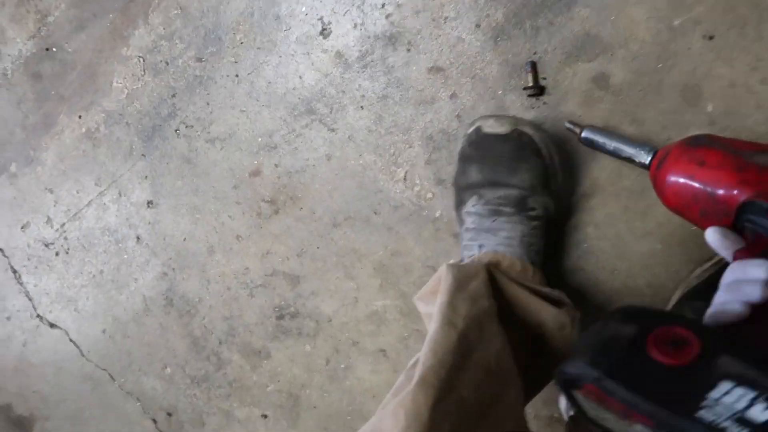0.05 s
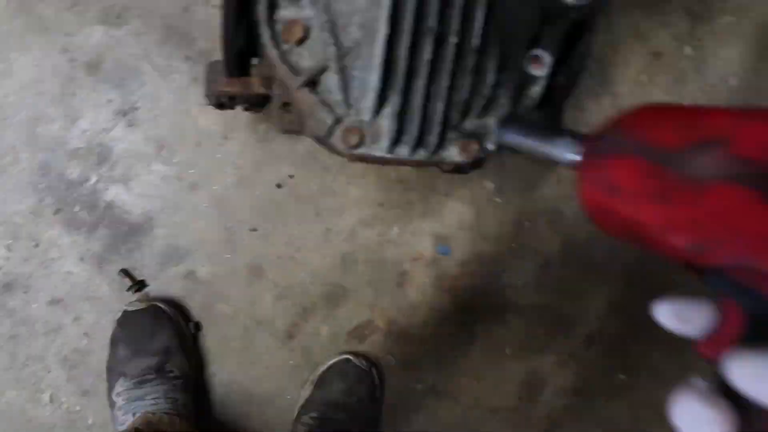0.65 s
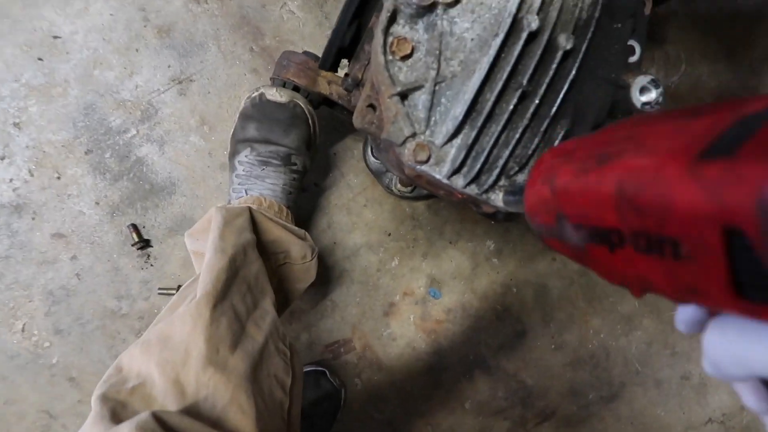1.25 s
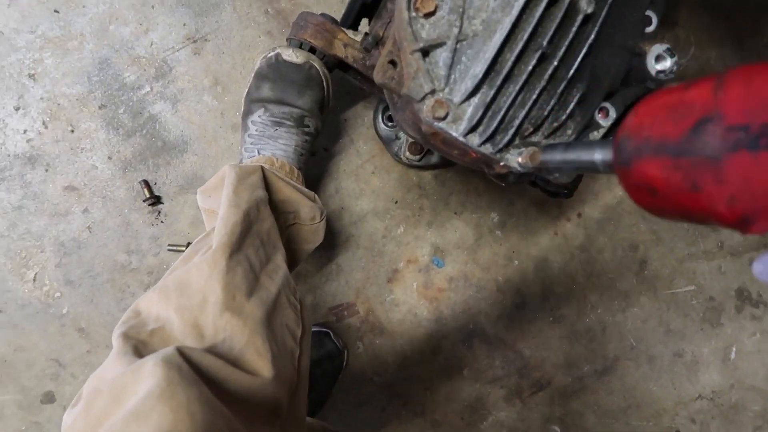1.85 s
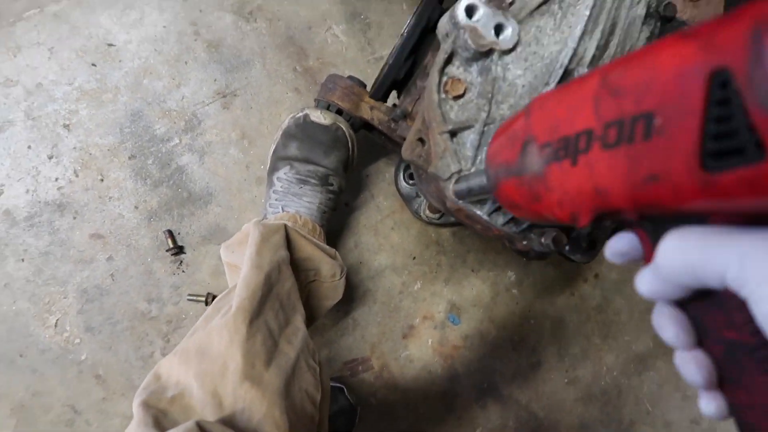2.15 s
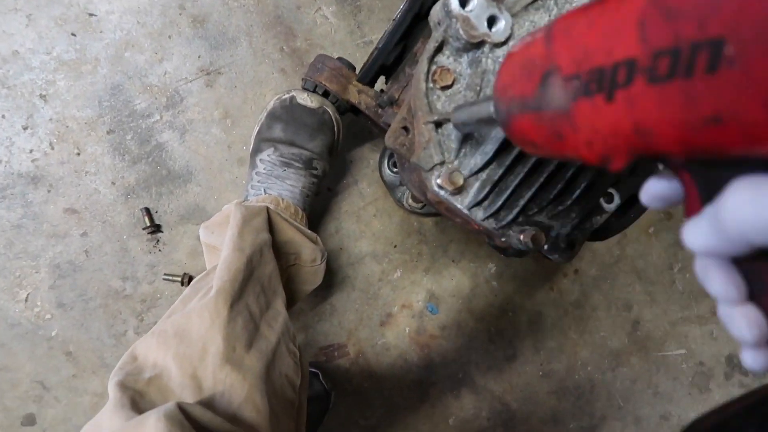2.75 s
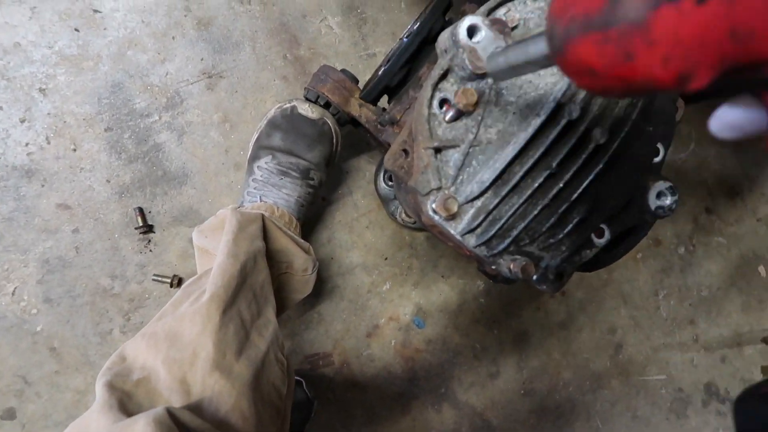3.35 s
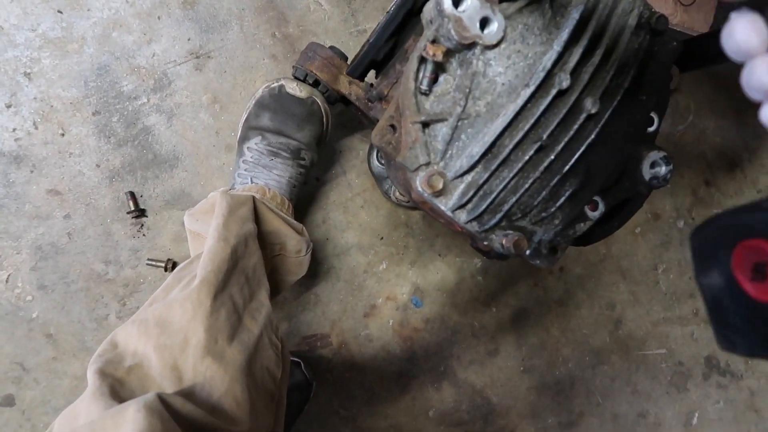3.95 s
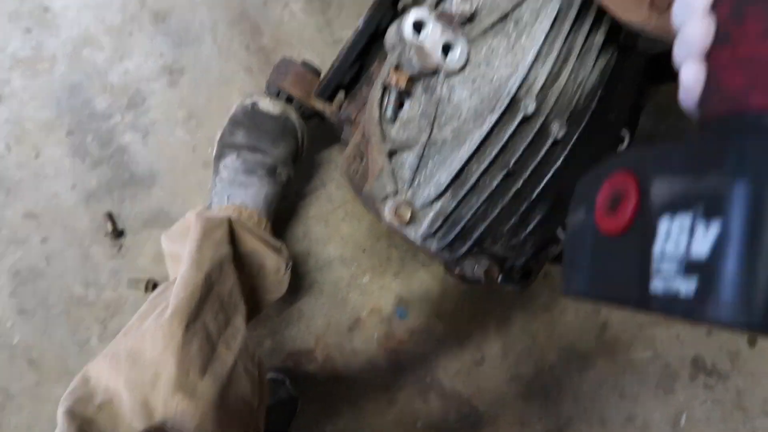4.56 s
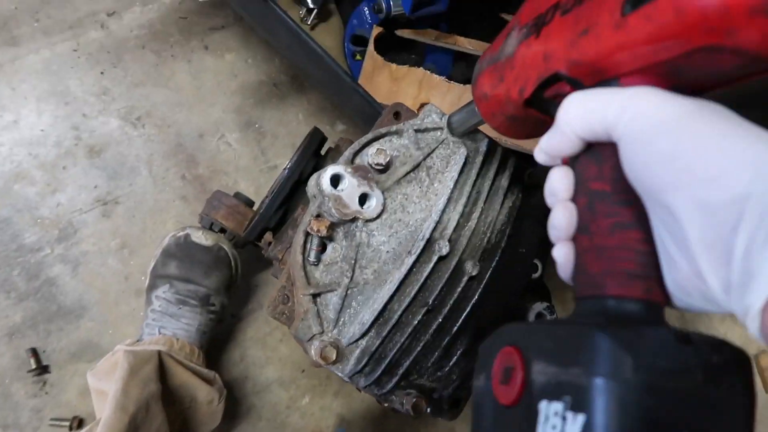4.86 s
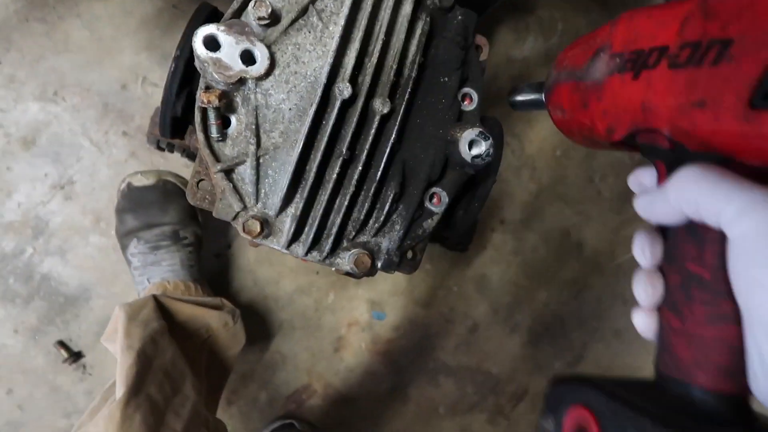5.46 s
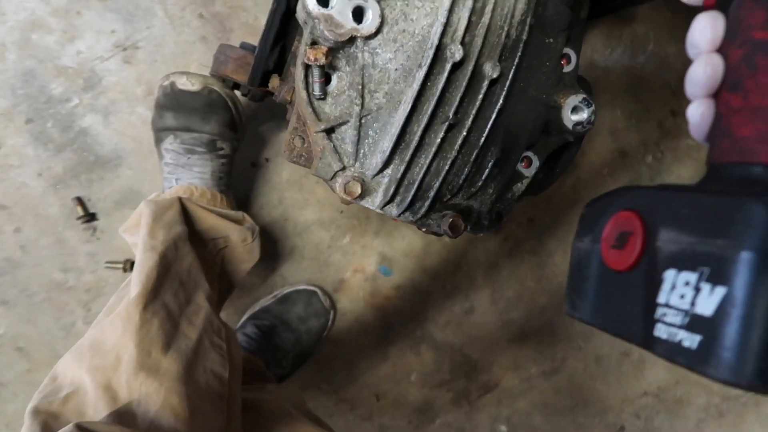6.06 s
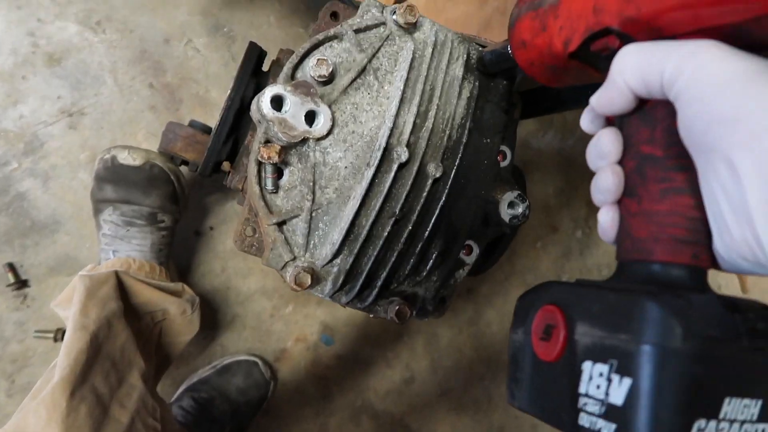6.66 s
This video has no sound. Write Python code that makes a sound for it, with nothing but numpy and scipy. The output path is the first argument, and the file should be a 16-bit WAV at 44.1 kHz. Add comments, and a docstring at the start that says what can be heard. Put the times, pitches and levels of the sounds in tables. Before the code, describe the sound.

Soft shuffling and a knock lead into five brief, sharp hammering bursts from a cordless impact wrench, about a second apart and very near the microphone. The motor whirs down after each one, and the socket clacks against the next bolt with a short ring. After the last burst, boots and tool bump about, with small gritty ticks and rustling cloth over the faint hiss of a workshop.

```python
"""A cordless impact wrench, close to a stereo microphone, knocks five bolts loose from a cast gear housing.
Each very short burst is a rattle of gears, a few hammer blows on the anvil and the falling whine of the
coasting motor. Between bursts the socket clanks onto bolt heads, boots and tool knock about, and clothes
rustle in a quiet workshop. The recorder's limiter ducks at the loud strikes, then lets the background
creep back up."""
import sys
import numpy as np
from scipy import signal
from scipy.fft import rfft, irfft, next_fast_len
from scipy.io import wavfile
from scipy.ndimage import uniform_filter1d, minimum_filter1d, map_coordinates

SR = 44100
rng = np.random.default_rng(int(sys.argv[2]) if len(sys.argv) > 2 else 0)


def materialize(psi):
    """Save the field psi as 16-bit PCM at rate SR to the path in sys.argv[1].

    A 1-D psi becomes a single channel; in a 2-D psi each row is a channel.
    """
    bounded = np.clip(np.atleast_2d(psi).T, -1, 1)
    quanta = np.round(bounded * 32767).astype(np.int16)
    wavfile.write(sys.argv[1], SR, quanta)


N = 296396

# how much the worker moves about: t/s, rumble level/dB
MOVEMENT = [(0, -46.5), (.38, -51), (.6, -40.5), (.76, -54.5), (.97, -46.5), (1.06, -43), (1.46, -42.5),
            (1.54, -46), (1.63, -51.5), (1.66, -75), (1.9, -69), (2.08, -59.5), (2.2, -48), (2.6, -59),
            (2.98, -53), (3.25, -59.5), (3.68, -53), (4.15, -56), (4.65, -49), (5.05, -56.5), (5.63, -49.5),
            (5.95, -55.5), (6.42, -41), (6.72, -48)]
# spectrum of rubbing cloth and scraping boots: f/Hz, level/dB
RUSTLE_SPECTRUM = [(180, -23), (300, -7), (816, -4), (1090, -9), (1240, -6), (1760, -24.5), (2000, -14),
                   (2600, -52), (4400, -120)]
# spectrum of struck steel: f/Hz, level/dB
STEEL_SPECTRUM = [(1000, -33), (1700, -2.5), (2300, -2), (2700, 5.5), (3220, -0.5), (4030, -12),
                  (4510, -5.5), (5300, -5), (6150, -6), (6880, -6), (7630, -5.5), (8800, -6), (10300, -10),
                  (11600, -10), (15200, -17), (16000, -30)]
# hammer contacts (graze, catch, strike, rebound): t/s, jolt/dB, jolt/Hz, crack/dB, ring/dB, main mode/Hz
HAMMER_BLOWS = [(1.4955, -4.5, 1200, -21.5, -13, 2750), (1.4979, -10, 1260, -1.5, -5.5, 9350),
                (1.4997, -18, 1260, -14, -5, 6900), (1.502, 10.5, 735, -6, -12, 2750),
                (1.5084, -6, 1210, -14, -19, 2750), (1.5115, 3.5, 680, -13, -17, 5200),
                (2.4139, -28, 1200, -20, -32, 11600), (2.4162, -15, 990, -28.5, -32, 5200),
                (2.428, -14, 1200, -13.5, -18, 2750), (2.436, -1.5, 547, -4, -5, 5200),
                (2.443, -19, 1400, -7, -9.5, 8650), (2.4462, 7, 897, -12.5, -14, 2750),
                (3.0886, -30, 1200, -26, -28, 5200), (3.0925, -18, 895, -24, -25, 5200),
                (3.1038, -12, 1304, -20, -13.5, 2750), (3.1062, -3.5, 1300, -4.5, 2.5, 8650),
                (3.1104, 6, 1050, -8.5, -18, 5200), (3.1175, -28, 1102, -19, -19, 8650),
                (3.1195, 2, 900, -21, -17, 11600), (3.8228, -24, 1106, -31, -30, 5200),
                (3.834, -6.5, 1100, -0.5, -11, 11600), (3.836, -16, 1250, -13, -10, 8650),
                (3.8381, 7.5, 931, -14, -6.5, 5200), (3.848, 2.5, 878, -15, -20, 2750),
                (4.8606, -32, 1300, -26.5, -31, 5200), (4.866, -6.5, 1320, -4, -7, 11600),
                (4.8686, -8.5, 1216, -20, -8, 2750), (4.876, -4, 1194, -2, -3.5, 9350),
                (4.8793, 7.5, 1000, -2, -13, 5200)]
# trigger pulls: strike/s, housing thud/dB, rattle/dB, release/s, whine/Hz, whine/dB,
# coasting time constant/s, whirr/dB, sizzle/dB, sizzle length/s
TRIGGER_PULLS = [(1.5017, 1, -15, 1.516, 11200, -47, .145, -37, -63, .33),
                 (2.4359, -9, -19, 2.462, 12250, -37, .195, -38, -58, .22),
                 (3.1102, -23, -17, 3.139, 13100, -35.5, .235, -37.5, -56.5, .32),
                 (3.8378, -18, -17, 3.878, 13100, -38.5, .245, -42, -56, .3),
                 (4.8791, -19, -17.5, 4.916, 12800, -35.5, .205, -37, -56.5, .27)]


def amp(db):
    """Decibels to gain."""
    return 10 ** (np.asarray(db) / 20)


def along(points, hz):
    """Read (f/Hz, value) points on a log frequency axis."""
    f, values = np.transpose(points)
    return np.interp(np.log(hz + 1), np.log(f + 1), values)


def curves(rows):
    """One value per sample for each column after the time."""
    times, *columns = np.transpose(rows)
    return [np.interp(np.arange(N) / SR, times, column) for column in columns]


def wobble(rate):
    """A smooth random curve, rate knots a second."""
    knots = rng.standard_normal(int(N * rate / SR) + 4)
    return map_coordinates(knots, [np.arange(N) * rate / SR])


def filtered(x, response):
    """Pass x through a complex response of frequency."""
    size = next_fast_len(N + SR // 2)
    return irfft(rfft(x, size) * response(np.fft.rfftfreq(size, 1 / SR)), size)[..., :N]


def noise(spectrum):
    """Noise of rms 1, coloured by (f/Hz, level/dB) points."""
    x = filtered(rng.standard_normal(N), lambda hz: amp(along(spectrum, hz)))
    return x / np.sqrt(np.mean(x ** 2) + 1e-20)


def add(track, s, sound):
    """Mix a sound into the track from time s on."""
    part = track[round(s * SR):][:len(sound)]
    part += sound[:len(part)]


def puffs(rows, rise, t60):
    """An envelope that swells quickly to each (t/s, level/dB) and dies away."""
    track, lead_s = np.zeros(N), .01
    t = np.arange(SR // 8) / SR - lead_s
    for s, db in rows:
        add(track, s - lead_s, amp(db - 60 * np.maximum(t, 0) / t60) * np.exp(np.minimum(t, 0) / rise))
    return track


def thumps(rows, first_hz, sweep, rise, fall):
    """A thump of dropping pitch at each (t/s, level/dB, f/Hz); sweep, rise and fall count in cycles."""
    track, lead_s = np.zeros(N), .01
    t = np.arange(SR // 30) / SR - lead_s
    for s, db, hz in rows:
        cycles = t * hz
        pitch = first_hz / (1 + max(first_hz / hz - 1, .05) * np.exp(cycles / sweep))
        phase = 2 * np.pi * np.cumsum(np.maximum(pitch, 0.3 * hz)) / SR
        shape = 1 / (np.exp(-cycles / rise) + np.exp(cycles / fall))
        wave = np.sin(phase - phase[round(lead_s * SR)] + rng.normal(0, 1.0))
        add(track, s - lead_s, amp(db) * shape / shape.max() * wave)
    return track


def diffuse(spectrum):
    """Stereo noise that reaches the microphone from all around."""
    # likeness of the two channels: f/Hz, left-right correlation
    likeness = [(60, 1), (150, 1), (380, 0.99), (950, 0.52), (2400, -0.5), (6000, -0.4), (15000, -0.56)]
    angle = lambda hz: np.arccos(np.clip(along(likeness, hz), -.99, .99)) / 2
    mid = noise(spectrum)
    side = filtered(noise(spectrum), lambda hz: np.tan(angle(hz)))
    return np.array([mid + side, mid - side])


def close_up(x):
    """A source near the microphone: centred in the bass, very wide in the treble, leaning as it moves."""
    # the work moves across the microphone: t/s, leftward share, share of the midrange arriving out of step
    position = [(1.46, .28, .13), (1.49, .25, .41), (1.6, .25, .27), (2.3, 1, 0), (4.9, .85, 0),
                (5.4, .2, .037)]
    # stereo width: f/Hz, side over mid/dB
    side_levels = [(60, -8), (200, -12), (400, -11), (700, -5), (1000, -2), (1400, 1), (2400, 6), (4500, 4),
                   (7000, 6), (8800, 13), (11500, 2), (15000, 3)]
    # phase of side against mid: f/Hz, phase/rad
    skew = [(150, .9), (350, 1.5), (500, -.75), (1600, -.75), (2200, .8), (5000, 1.1), (8000, 1.5)]
    # the band that arrives out of step: f/Hz, gain
    midrange = [(200, 0), (450, 1), (1400, 1), (1900, 0)]
    lean, apart = curves(position)
    width = lambda hz: amp(along(side_levels, hz))
    mid = filtered(x, lambda hz: 1 / np.hypot(1, width(hz)))
    side = filtered(mid, lambda hz: 1j * width(hz) * np.sin(along(skew, hz)))
    side += lean * filtered(mid, lambda hz: width(hz) * np.cos(along(skew, hz)))
    spread = apart * filtered(mid, lambda hz: along(midrange, hz))
    mid -= spread
    side += filtered(spread, lambda hz: -1j)  # a quarter cycle late
    return np.array([mid + side, mid - side])


def workshop_echo(x):
    """The workshop's short tail, different in each channel."""
    # reverberation time: f/Hz, t60/s
    decay = [(150, 0.038), (600, 0.4), (3000, 0.036), (12000, 0.29)]
    hz, t, bands = signal.stft(rng.standard_normal((2, SR // 2)), SR, nperseg=256)
    tail = signal.istft(bands * amp(-60 * t / along(decay, hz)[:, None]), SR, nperseg=256)[1]
    return signal.fftconvolve(x[None], tail / np.linalg.norm(tail[0]), axes=1)[:, :N]


def hum_and_whistle():
    """A faint whistle wavers in the workshop throughout; a hum with its octave joins it late."""
    # the hum: t/s, fundamental/dB, octave/dB
    hum_levels = [(4.5, -58, -72), (6.2, -61, -63), (6.4, -51, -61), (6.72, -50, -57)]
    hum_hz, whistle_hz = 450.5, 3225
    low_db, octave_db = curves(hum_levels)
    phase = 2 * np.pi * np.cumsum(hum_hz * (1 + 0.00474 * wobble(15))) / SR
    fade_in = np.clip((np.arange(N) / SR - hum_levels[0][0]) / 0.063, 0, 1)
    hum = fade_in * (amp(low_db) * np.sin(phase) + amp(octave_db) * np.sin(2 * phase))
    pitch = whistle_hz * (1 + .012 * wobble(6.7) + 0.029 * wobble(200))
    whistle = amp(-71 + 3 * wobble(8.7)) * np.sin(2 * np.pi * np.cumsum(pitch) / SR)
    return hum + whistle


def shuffle_and_hiss():
    """The worker's movement drives a handling rumble and cloth rustle, over the workshop's hiss."""
    # handling rumble: f/Hz, level/dB
    rumble_spectrum = [(12, -33), (20, -18.5), (53, -5.5), (86, 0), (141, 3), (276, -5), (437, -7.5),
                       (500, -15), (650, -29), (1100, -120)]
    # workshop hiss: f/Hz, level/dB
    hiss_spectrum = [(880, -12.5), (1500, 1.5), (1780, -5.5), (2250, 0), (2510, 4), (2880, -5.5), (3120, 5),
                     (3410, -5.5), (4080, -1), (5380, -9.5), (8740, -12), (9950, -16.5), (12100, -10.5),
                     (13800, -14.5), (16000, -24.5)]
    rumble_db, = curves(MOVEMENT)
    effort_db = rumble_db + 48  # zero at ordinary movement
    jostle = wobble(60)
    rumble = amp(rumble_db + 0.5 + 2.5 * jostle + 0.67 * wobble(25)) * diffuse(rumble_spectrum)
    rustle = amp(-55 + 0.21 * effort_db + 2.8 * jostle + 1.7 * wobble(160)) * diffuse(RUSTLE_SPECTRUM)
    hiss = amp(-56.5 + 0.012 * effort_db + 1.63 * wobble(60)) * diffuse(hiss_spectrum)
    return rumble + rustle + hiss


def grit(per_s=4.9, spread_db=3.5):
    """Grit ticks underfoot on the concrete at random, harder while the worker moves."""
    when, force = rng.random((round(per_s * N / SR), 2)).T
    times = .02 + when * (N / SR - .1)
    effort_db = np.interp(times, *np.transpose(MOVEMENT)) + 48  # zero at ordinary movement
    db = -44 + 0.33 * effort_db + spread_db * (2 * force - 1)
    return puffs(zip(times, db), rise=0.0005, t60=0.019) * noise(STEEL_SPECTRUM)


def ticks():
    """Grit and steel tick lightly, nearly all treble."""
    # light contacts: t/s, level/dB
    contacts = [(.355, -44), (.3836, -41.5), (1.2235, -35), (1.949, -46.5), (2.066, -41), (2.0875, -41),
                (2.1085, -36), (2.3255, -40.5), (4.2605, -43), (4.42, -38), (4.463, -34.5), (4.761, -40.5),
                (5.226, -46), (5.399, -43), (5.452, -39.5), (5.516, -44), (5.666, -41), (5.9735, -41.5),
                (6.162, -39.5), (6.2405, -37), (6.517, -41), (6.539, -42)]
    treble = noise([(1500, -29), (4000, -8), (9000, 3.5), (15000, -2.5)])
    return puffs(contacts, rise=0.00022, t60=0.0083) * treble


def knocks():
    """Boots and tool bump and scrape near the microphone without ringing."""
    # knocks of boots and tool: t/s, peak/dB, f/Hz, scrape/dB
    contacts = [(0.578, -31.5, 120, -50), (0.69, -25, 400, -60), (1.033, -30.5, 127, -49),
                (1.145, -28, 251, -43), (1.456, -13.5, 610, -26), (1.750, -32, 700, -29),
                (2.027, -41, 447, -38.5), (2.938, -35, 740, -40), (2.961, -28.5, 354, -36),
                (4.343, -30.5, 700, -36), (4.435, -38, 600, -38), (4.616, -18, 620, -40),
                (4.646, -26, 620, -38), (4.756, -27, 550, -40), (5.17, -27, 650, -46),
                (5.352, -27.5, 326, -57), (5.4649, -20.5, 470, -32.5), (5.554, -32, 376, -38),
                (5.638, -29.5, 325, -33), (5.676, -33.5, 390, -35), (5.752, -28, 392, -53),
                (6.073, -30, 610, -33), (6.166, -34, 454, -36.5), (6.256, -18, 850, -31),
                (6.263, -27, 810, -28), (6.403, -25.5, 382, -35), (6.448, -26.5, 255, -38),
                (6.545, -23.5, 440, -34)]
    times, db, hz, scrape_db = np.transpose(contacts)
    bumps = thumps(zip(times, db, hz), first_hz=1520, sweep=1.0, rise=0.2, fall=0.31)
    scrapes = amp(-5) * puffs(zip(times, scrape_db), rise=0.0031, t60=0.029) * noise(RUSTLE_SPECTRUM)
    return bumps + scrapes


def socket():
    """The socket clacks onto a bolt head with a short ping, and the cast housing rings briefly."""
    # socket meets bolt head: t/s, clack/dB, clack/Hz, click/dB, housing ring/dB, socket ping/dB
    clanks = [(0.438, -34, 1200, -30.5, -44, -56), (2.142, -37, 1200, -31.5, -35.5, -49),
              (2.2175, -27, 1240, -33, -27.5, -37), (2.3095, -11, 1260, -24, -16.5, -41),
              (3.0165, -20.5, 1150, -26, -23.5, -42), (3.7107, -13.5, 1080, -26.5, -19.5, -20),
              (4.5361, -18.5, 1090, -27, -20.5, -17), (6.555, -51, 1200, -47, -31, -51)]
    # modes of the cast housing: f/Hz, level/dB, t60/s
    housing_modes = [(318, 1, 0.033), (408, 5, 0.069), (494, 3, 0.073), (579.6, -6.5, 0.24), (682, 4, 0.03),
                     (834, 4.5, 0.039), (1086, -5, 0.088), (1406, 6, 0.02), (2290, -11.5, 0.11)]
    # the socket's ping: f/Hz, level/dB
    ping_spectrum = [(900, -27.5), (1600, -6), (2100, -4), (2700, 8.5), (3150, -27), (3700, -31),
                     (4500, -13), (6000, -48), (9000, -16)]
    times, clack_db, clack_hz, click_db, ring_db, ping_db = np.transpose(clanks)
    ring = np.zeros(N)
    t = np.arange(SR // 5) / SR
    attack = 1 - np.exp(-t / 0.00013)
    for s, db in zip(times, ring_db):
        modes = np.zeros(len(t))
        for hz, mode_db, t60 in housing_modes:
            level = amp(mode_db + rng.normal(0, 1.0) - 60 * t / t60)
            modes += level * np.sin(2 * np.pi * (hz * t + rng.random()))
        add(ring, s, amp(db + 1.5) * attack * modes / abs(modes).max())
    snap = puffs(zip(times, click_db), rise=0.00031, t60=.006)
    chatter = amp(-13) * puffs(zip(times, click_db), rise=0.0004, t60=0.058)
    click = (snap + chatter) * noise(STEEL_SPECTRUM)
    ping = puffs(zip(times, ping_db), rise=0.001, t60=0.011) * noise(ping_spectrum)
    clack = thumps(zip(times, clack_db, clack_hz), first_hz=1490, sweep=1.84, rise=0.88, fall=0.7)
    return ring + click + ping + clack


def sizzle():
    """A thin, grainy sizzle hangs on after each burst and dies away unevenly."""
    # the lingering treble: f/Hz, level/dB
    spectrum = [(7000, -30), (9500, -9), (11200, 2), (12400, -1), (13200, 7), (14500, 7), (15500, -4)]
    level = np.zeros(N)
    age = np.arange(SR // 2) / SR
    for strike, *_, db, length_s in TRIGGER_PULLS:
        add(level, strike, amp(db) * np.exp(-(age / length_s) ** 2))
    grain = amp(3 * wobble(350) + 2 * wobble(25))
    return level * grain * noise(spectrum)


def motor():
    """Gears rattle up to the strike; on release the motor coasts down with a whirr and a falling whine."""
    # gears under load: f/Hz, level/dB
    gear_spectrum = [(80, -45), (300, 2), (800, -0.5), (1400, 6), (1800, -7.5), (2700, -10), (4000, -33)]
    # coasting gears: f/Hz, level/dB
    whirr_spectrum = [(700, 0.5), (1500, 6.5), (2000, -1), (2700, 5.5), (3900, -15), (5300, 1),
                      (6200, -10.5), (7000, 3), (7900, -8.5), (8800, -5), (10000, -19), (11400, 6.5),
                      (12800, -13), (14500, -1), (16000, -32)]
    # resonances of the wrench's shell, which the whine slides through: f/Hz, gain/dB
    shell = [(3600, -42), (4900, -23), (5800, -30), (6600, -23), (7500, -22), (8500, -6), (9300, -13),
             (9800, -11), (10500, -1), (11700, 0), (12500, -4), (13300, -6)]
    spin_up_s, rattle_rise_s, rattle_fall_s = 0.02, 0.0079, 0.0075
    cam_hz, cam_db = 47.5, -1.5  # the free hammer brushes the anvil: full-speed rate, swing of the whirr
    rattle, whirr, whine = np.zeros((3, N))
    age = np.arange(SR // 2) / SR
    attack = np.clip(age / 0.0018, 0, 1)
    for strike, _, rattle_db, release, hz, whine_db, coast_s, whirr_db, *_ in TRIGGER_PULLS:
        start = strike - spin_up_s
        t = start + age
        slack = np.where(t < strike, (strike - t) / rattle_rise_s, (t - strike) / rattle_fall_s)
        add(rattle, start, amp(rattle_db) * attack * np.exp(-slack))  # the load peaks at the strike
        speed = np.exp(-np.maximum(t - release, 0) / coast_s)
        free = np.clip((t - strike) / (release - strike), 0, 1)  # the bolt lets go
        cam = np.cos(2 * np.pi * cam_hz * np.cumsum(speed) / SR)
        add(whirr, start, amp(whirr_db + cam_db * cam) * np.sqrt(free) * speed ** 2.7)
        flutter = 1 + .014 * wobble(1000)[:len(t)]
        level = amp(whine_db + along(shell, hz * speed)) * free ** 3
        add(whine, start, level * np.sin(2 * np.pi * np.cumsum(hz * speed * flutter) / SR))
    teeth = amp(2.2 * wobble(500))
    gears = rattle * teeth * (amp(-1) * noise(gear_spectrum) + amp(-2) * noise(STEEL_SPECTRUM))
    roughness = amp(3.5 * wobble(400))
    return gears + teeth * whirr * noise(whirr_spectrum) + whine * roughness


def anvil():
    """Each blow rings the anvil and socket for milliseconds; where it lands favours one mode."""
    # modes of anvil and socket, damped by the bolt: f/Hz, t60/s
    modes = [(2750, 0.017), (5200, 0.0036), (6900, .004), (8650, 0.0033), (9350, 0.0031), (11600, 0.0045)]
    focus_octaves, other_modes_db = .1, -15
    ring = np.zeros(N)
    t = np.arange(SR // 30) / SR - .005
    attack = np.exp(np.minimum(t, 0) / 0.00031)
    for s, *_, db, focus_hz in HAMMER_BLOWS:
        for hz, t60 in modes:
            off_focus = min((np.log2(hz / focus_hz) / focus_octaves) ** 2, 1)
            level = amp(db + other_modes_db * off_focus - 60 * np.maximum(t, 0) / t60) * attack
            add(ring, s + t[0], level * np.sin(2 * np.pi * (hz * t + rng.random())))
    return amp(-3.5) * ring


def hammer():
    """Each hammer contact cracks on the anvil and jolts the wrench; the main strike thuds in the housing."""
    thud_hz, thud_lag_s = 260, 0.00069
    low_cut_hz = 131  # the jolts fall away below this
    times, jolt_db, jolt_hz, crack_db, *_ = np.transpose(HAMMER_BLOWS)
    cracks = amp(-5) * puffs(zip(times, crack_db), rise=0.00046, t60=0.0048) * noise(STEEL_SPECTRUM)
    jolts = thumps(zip(times, jolt_db, jolt_hz), first_hz=1395, sweep=0.32, rise=0.67, fall=0.29)
    jolts = filtered(jolts, lambda hz: 1j * hz / (low_cut_hz + 1j * hz))
    strikes = [(s + thud_lag_s, thud_db, thud_hz) for s, thud_db, *_ in TRIGGER_PULLS]
    thuds = thumps(strikes, first_hz=500, sweep=0.28, rise=0.29, fall=0.17)
    return cracks + jolts + thuds


def scene():
    """The wrench is close to the microphone and dry; the smaller contacts get more of the room."""
    wrench = hammer() + anvil() + motor()
    clanks = socket()
    bumps = knocks() + grit() + ticks()
    echo = workshop_echo(amp(-32) * wrench + amp(-21.5) * clanks + amp(-14.5) * bumps)
    return close_up(wrench + clanks + bumps) + echo + sizzle() + shuffle_and_hiss() + hum_and_whistle()


def limiter(x, ceiling_db=3, deepest_cut_db=5.5, look_ahead_s=.0008, hold_s=0.34, recover_db_per_s=15.5):
    """The recorder's gain drops just ahead of a peak over the ceiling, holds, then climbs back steadily."""
    peak_db = 20 * np.log10(abs(x).max(0) + 1e-9)
    over_db = np.clip(peak_db - ceiling_db, 0, deepest_cut_db)
    half_hold, ahead = round(hold_s * SR / 2), round(look_ahead_s * SR)
    held_db = -minimum_filter1d(-over_db, 2 * half_hold + 1, origin=half_hold - ahead, mode="constant")
    climb_db = recover_db_per_s * np.arange(N) / SR
    cut_db = np.maximum.accumulate(held_db + climb_db) - climb_db
    return x * amp(-uniform_filter1d(cut_db, size=2 * ahead))


def record(dry):
    """The limiter ducks, the hardest peaks still clip, and the highest treble is cut off."""
    top_hz = 15900
    return filtered(np.clip(limiter(dry), -1, 1), lambda hz: hz < top_hz)


dry = scene()
out = record(dry)
materialize(out)
```